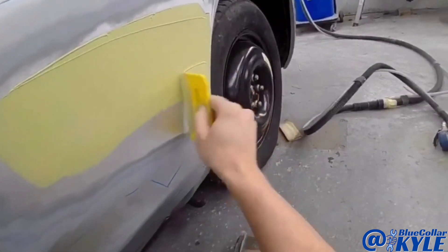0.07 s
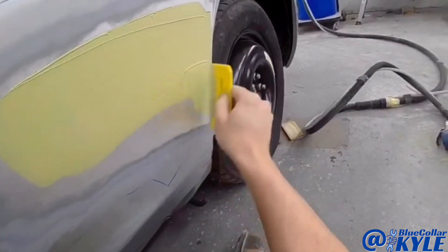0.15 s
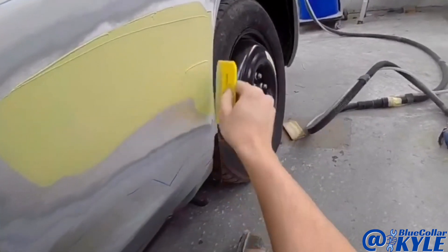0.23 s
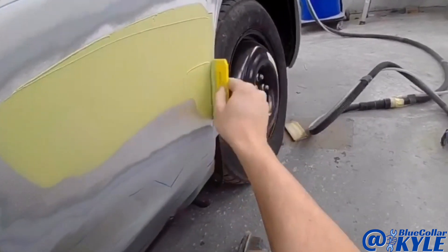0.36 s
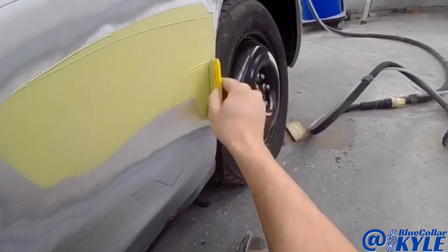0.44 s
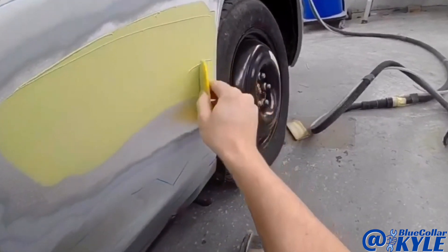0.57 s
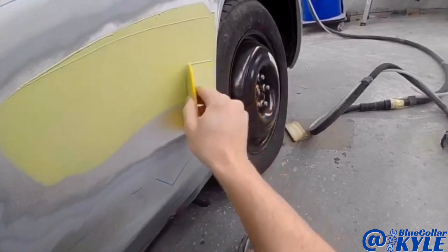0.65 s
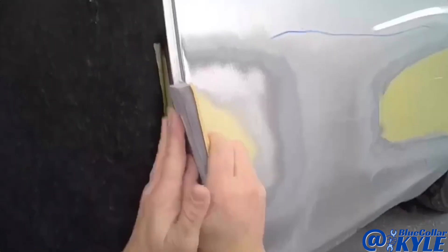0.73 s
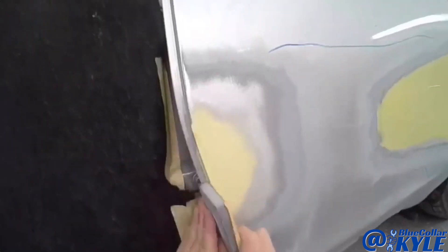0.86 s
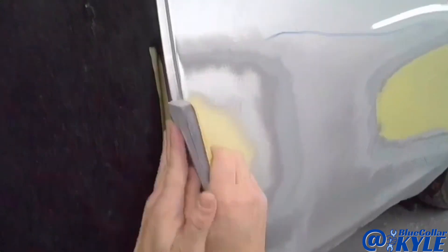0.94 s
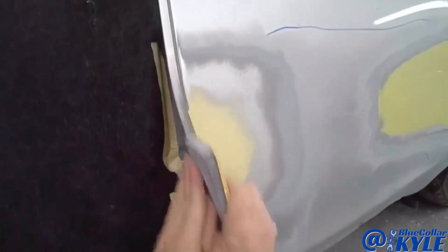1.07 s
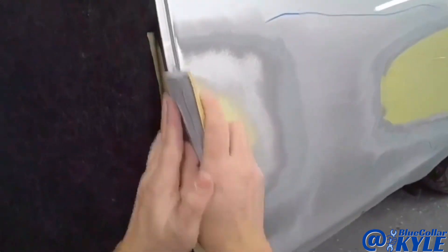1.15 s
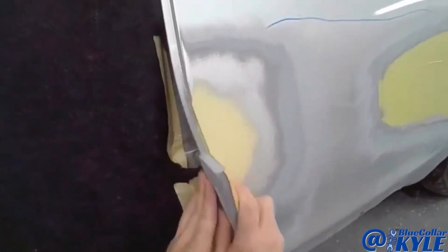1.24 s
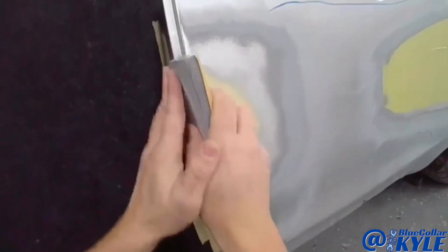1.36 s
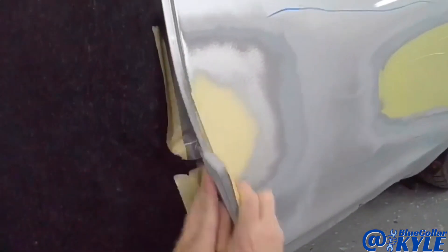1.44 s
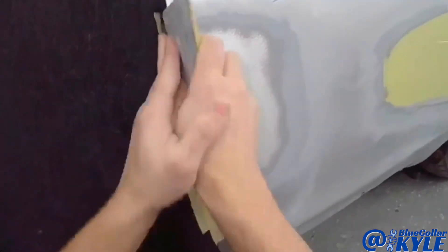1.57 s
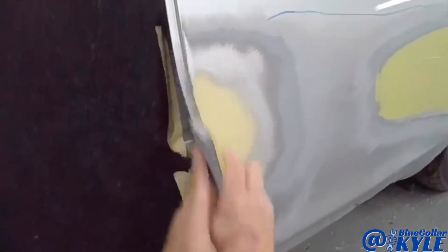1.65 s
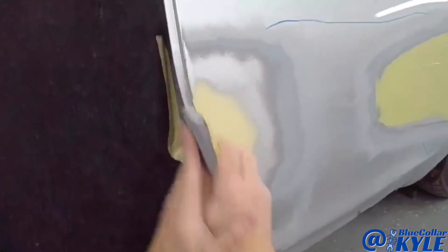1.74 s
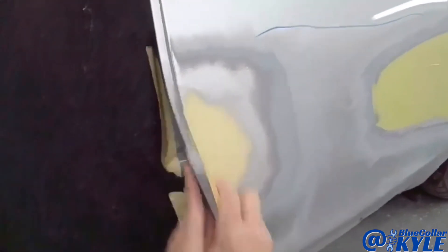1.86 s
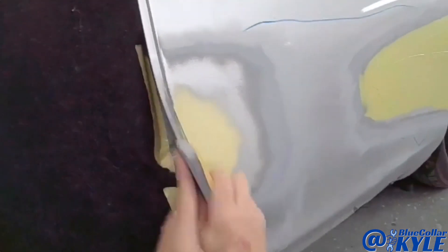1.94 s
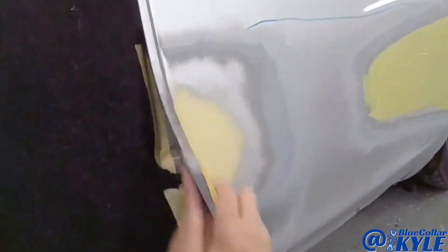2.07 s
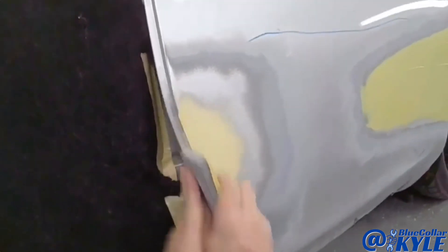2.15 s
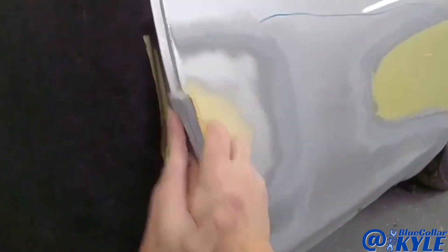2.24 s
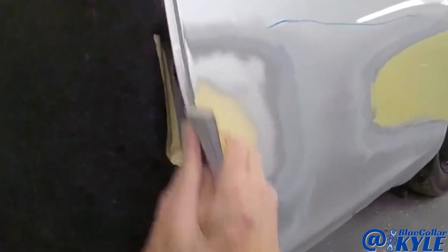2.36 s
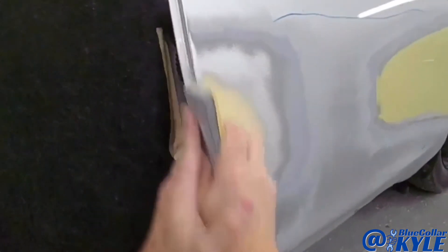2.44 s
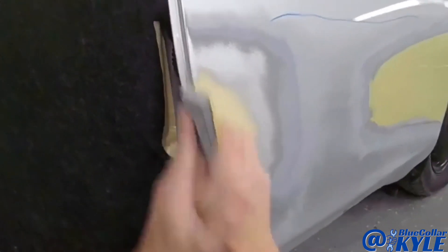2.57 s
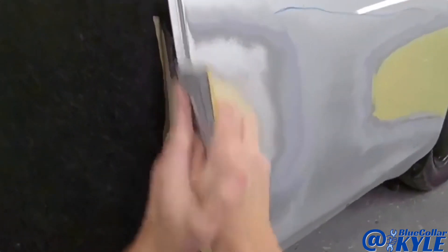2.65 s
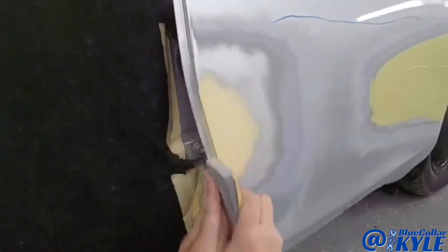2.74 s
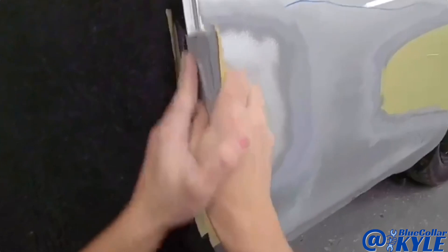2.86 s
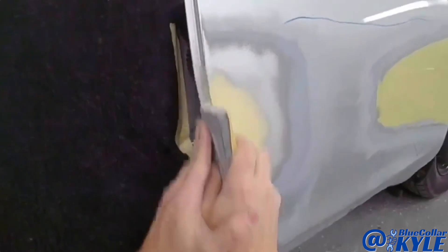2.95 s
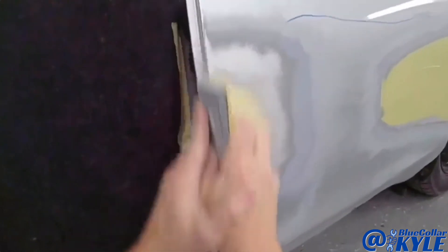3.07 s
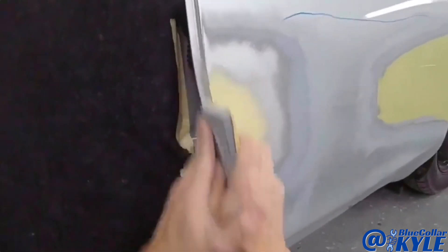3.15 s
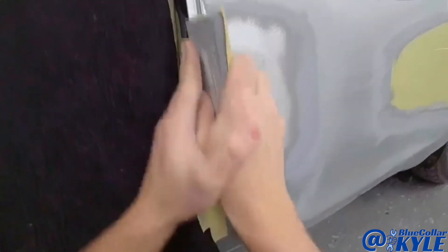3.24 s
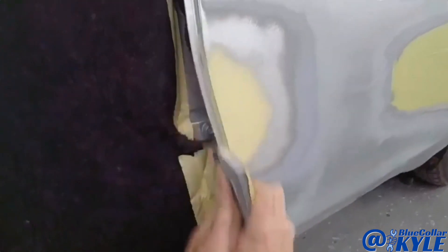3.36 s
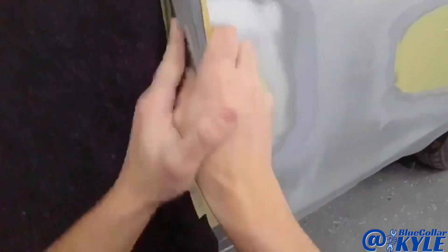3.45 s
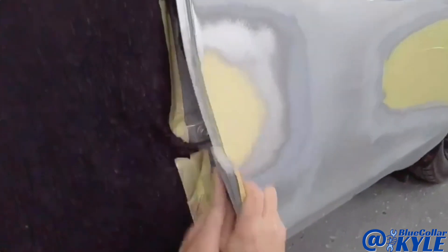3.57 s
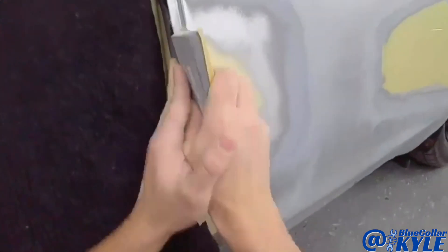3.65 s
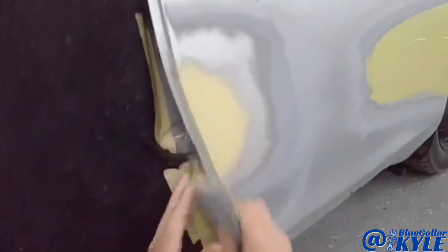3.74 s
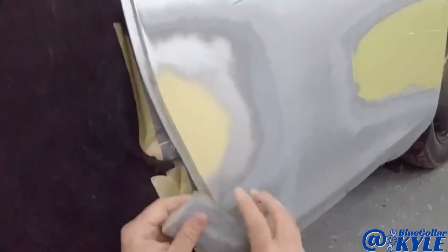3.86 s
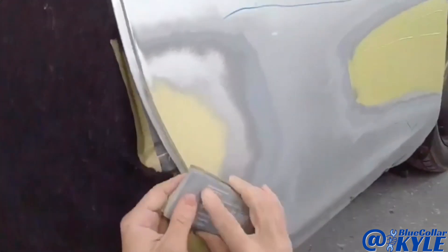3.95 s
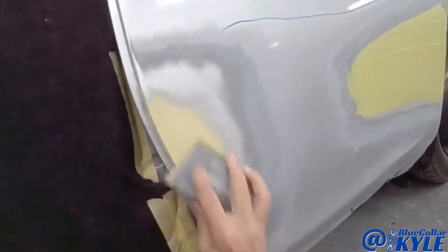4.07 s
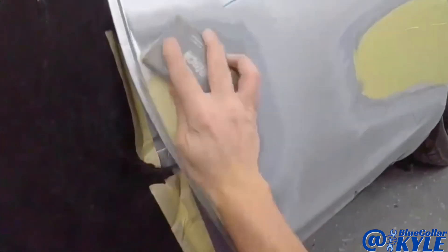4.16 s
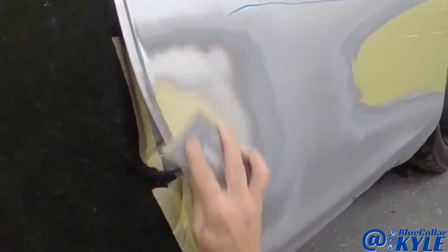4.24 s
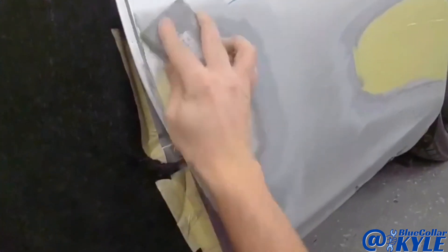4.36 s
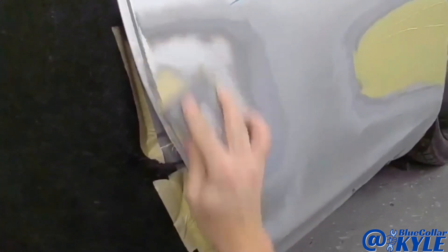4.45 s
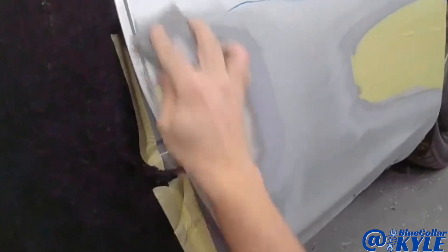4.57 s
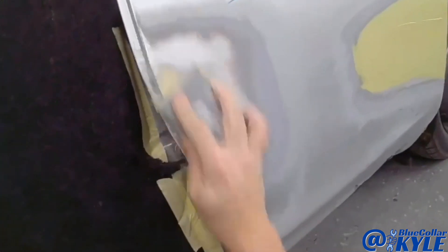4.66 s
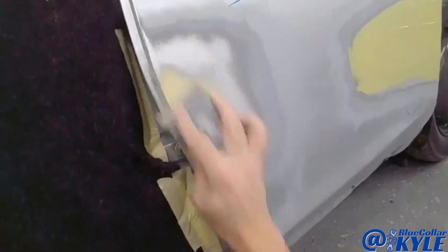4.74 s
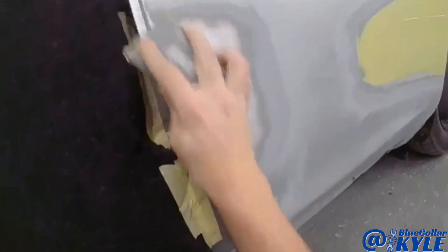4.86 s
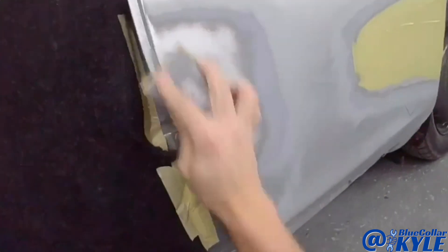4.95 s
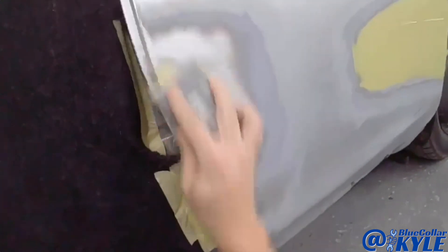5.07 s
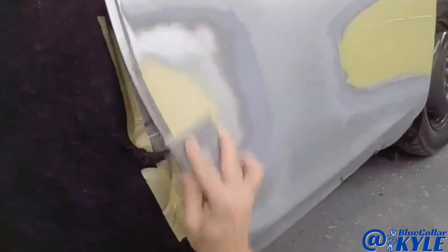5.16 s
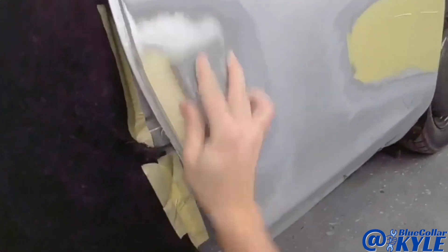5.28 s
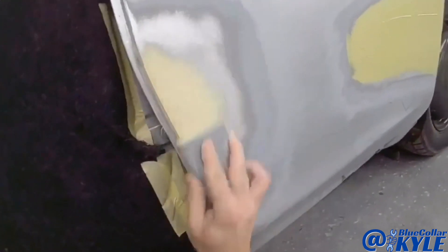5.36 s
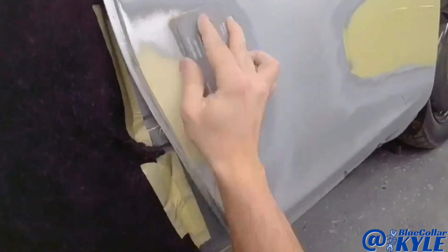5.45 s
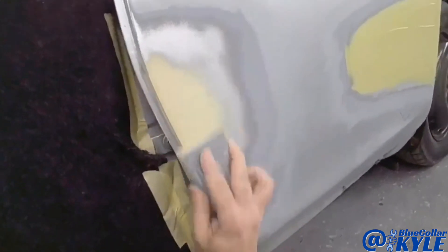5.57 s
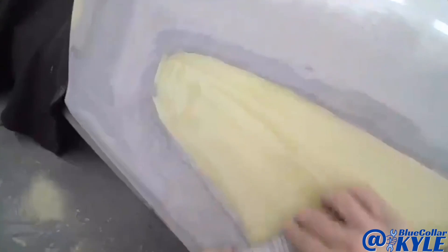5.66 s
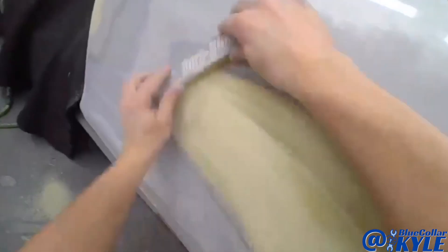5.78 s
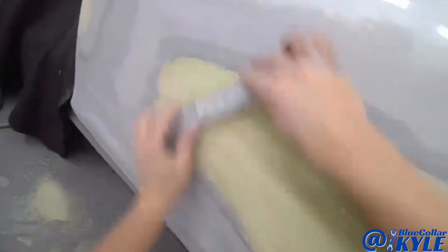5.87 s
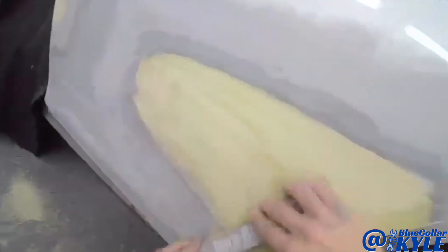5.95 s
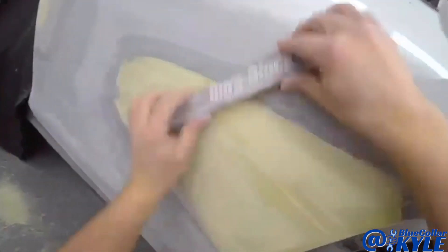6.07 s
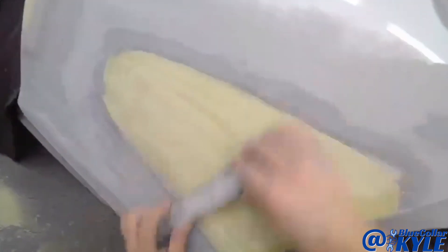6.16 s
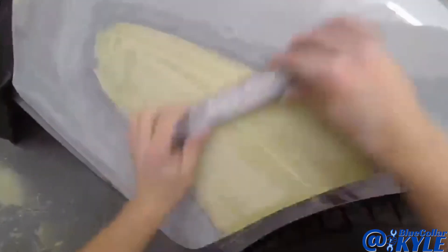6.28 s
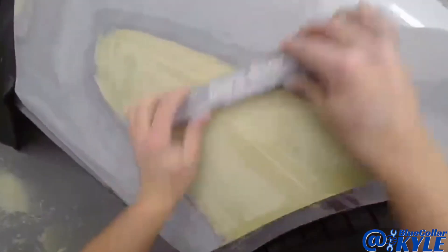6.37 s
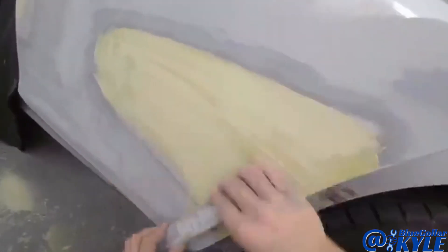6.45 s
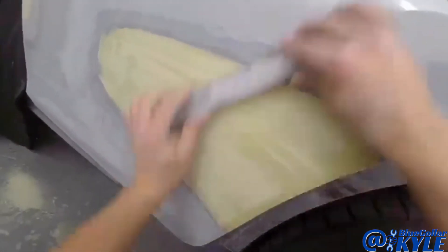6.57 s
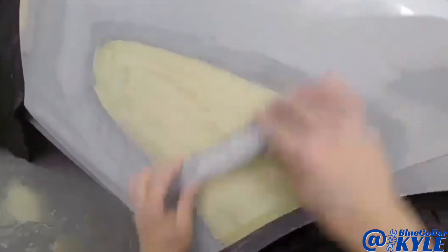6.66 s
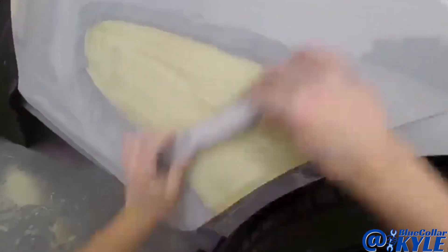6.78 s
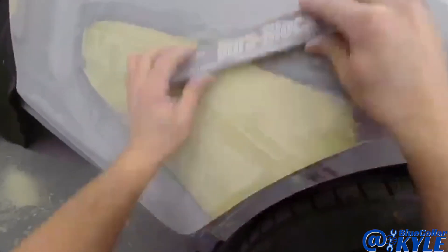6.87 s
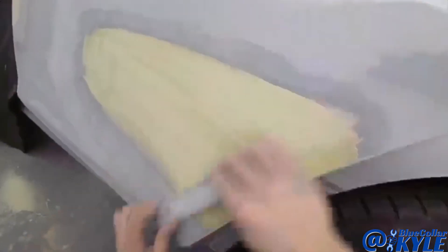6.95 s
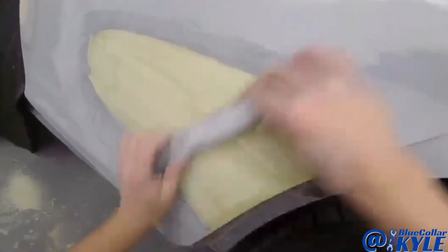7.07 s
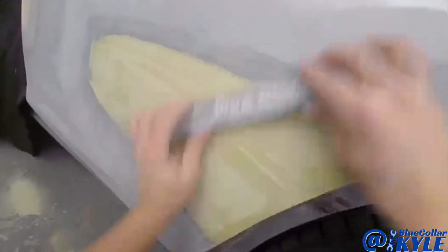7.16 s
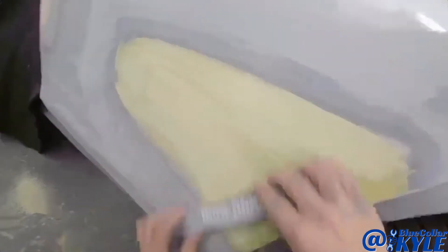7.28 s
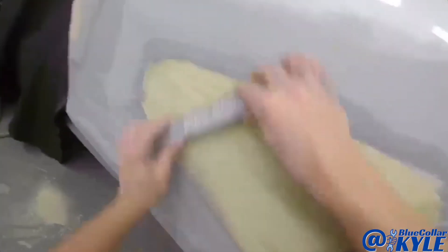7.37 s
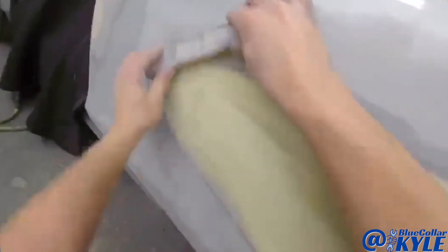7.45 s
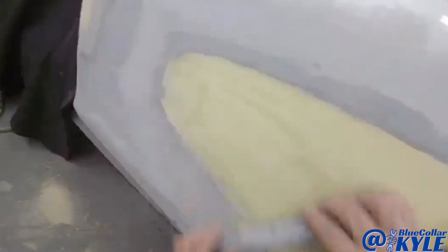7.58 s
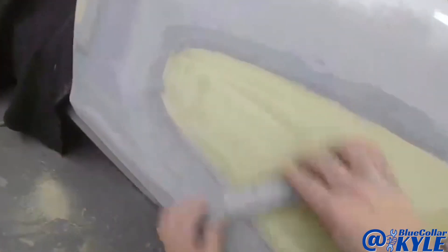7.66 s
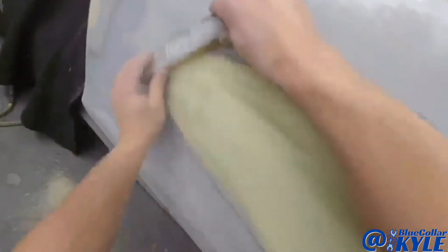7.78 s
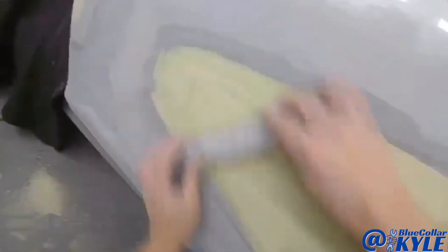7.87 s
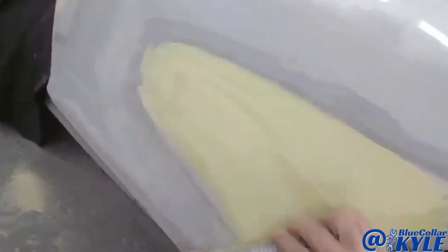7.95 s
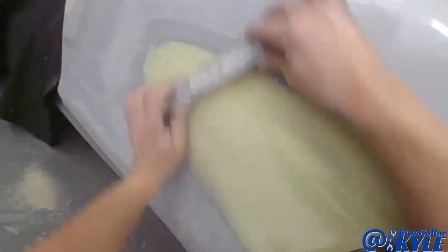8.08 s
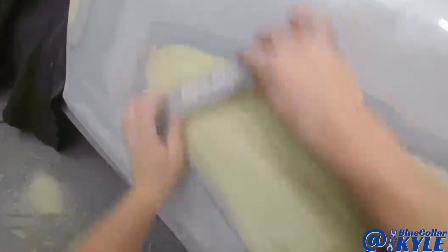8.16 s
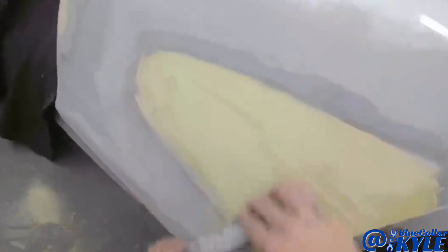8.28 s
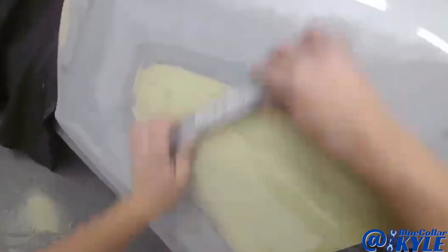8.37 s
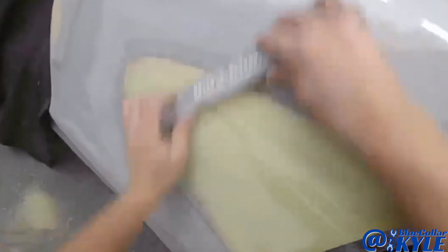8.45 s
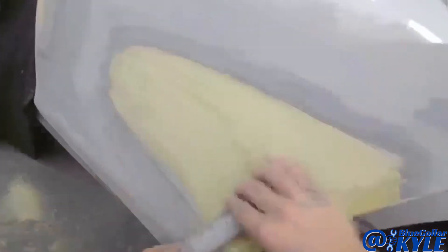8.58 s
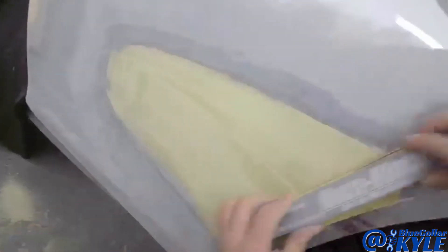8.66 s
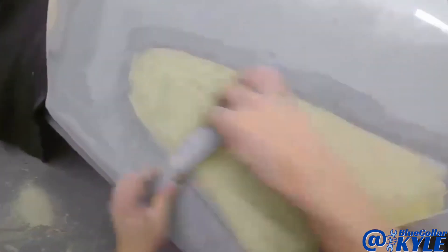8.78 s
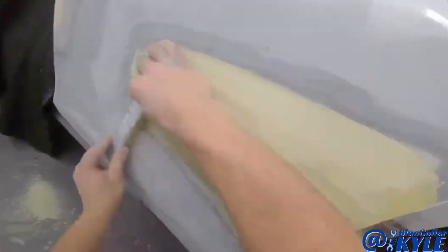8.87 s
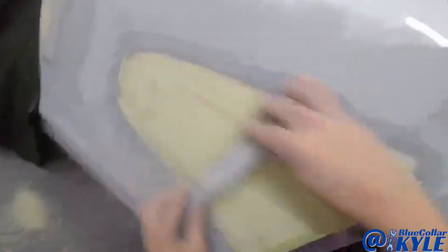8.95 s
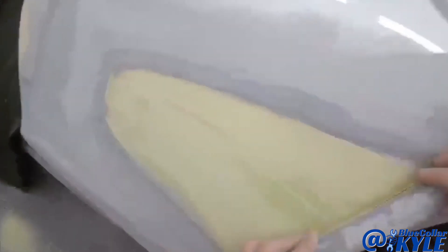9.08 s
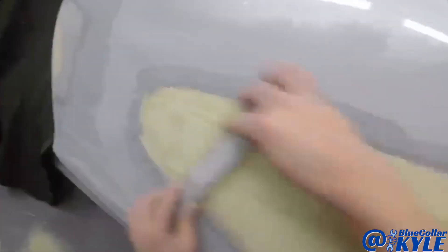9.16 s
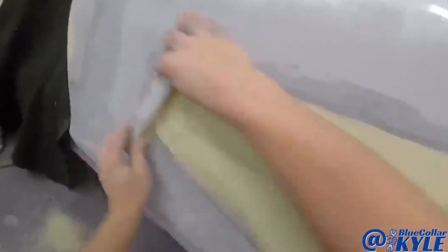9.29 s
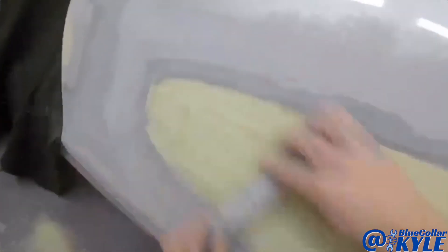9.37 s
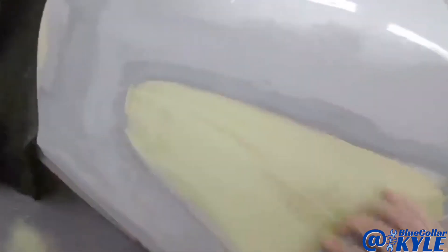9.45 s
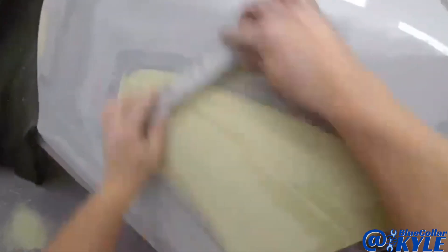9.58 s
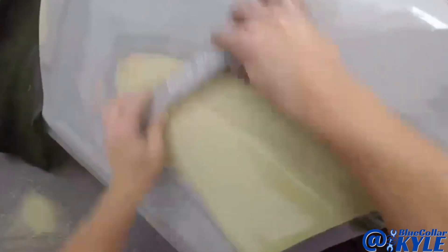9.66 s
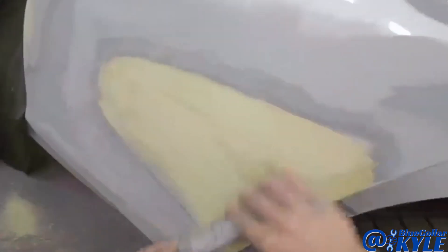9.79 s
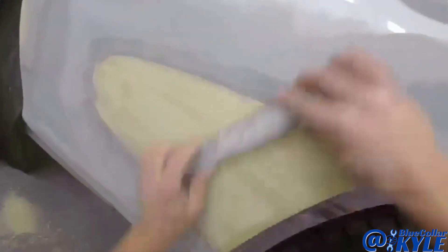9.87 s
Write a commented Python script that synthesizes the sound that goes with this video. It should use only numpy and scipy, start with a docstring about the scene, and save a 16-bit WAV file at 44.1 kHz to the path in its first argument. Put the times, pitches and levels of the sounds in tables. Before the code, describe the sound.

Sandpaper on a block rasps back and forth over body filler on a car panel, heard close in mono over a quiet workshop fan. A brief spreader swish comes first, followed by fast, gritty edge strokes that catch and bite. After a short break the scraping turns smoother and brighter, then changes to longer, hissier sweeps as the fan grows fainter. Now and then the block softly knocks the panel.

```python
"""Hand sanding of body filler on a car panel, close and in mono, in a workshop with a running fan.
After one swipe of a spreader, a small block works the panel's edge, then its face; then a long block
sweeps the filler. Each stroke speeds up and slows to turn; its grit ticks ring the block and the sheet
metal, and the paper chatters, clings and bites as it drags. Now and then the block bumps the panel."""
import sys
import numpy as np
from scipy import signal
from scipy.fft import rfft, irfft
from scipy.io import wavfile
from scipy.ndimage import map_coordinates

SR = 44100
rng = np.random.default_rng(int(sys.argv[2]) if len(sys.argv) > 2 else 0)


def generate_wav(signal):
    """Clip the signal to [-1, 1] and save it as 16-bit WAV at the path in sys.argv[1]."""
    frames = np.transpose(np.atleast_2d(signal))
    scaled = np.clip(frames, -1, 1) * 32767
    pcm = np.round(scaled).astype(np.int16)
    wavfile.write(sys.argv[1], SR, pcm)


N = 437472
TIME = np.arange(N) / SR
SANDING_START_S, LONG_START_S = .729, 5.666


# Strokes, each lasting until the next turn: t/s, level/dB, tilt of hiss over panel drone/dB
EDGE_STROKES = [(0.703, -41.5, -3.0), (0.798, -41.6, 4.0), (0.895, -40.5, -1.0), (0.995, -44.3, 0.0),
                (1.081, -41.6, -3.0), (1.186, -44.5, -1.0), (1.289, -42.3, -2.0), (1.396, -44.1, 2.0),
                (1.51, -43.5, -1.0), (1.625, -43.8, -0.0), (1.741, -42.1, 0.0), (1.833, -43.3, 5),
                (1.943, -41.0, 0.0), (2.054, -43.3, 1.0), (2.159, -41.3, -4.0), (2.267, -48.5, -4.0),
                (2.356, -43.6, -6.0), (2.457, -43.3, 1.0), (2.561, -41.0, 3.0), (2.669, -42.8, 3.0),
                (2.779, -42.2, -1.0), (2.89, -43.9, -2.0), (2.969, -44.1, -3.0), (3.065, -43.3, -1.0),
                (3.173, -43.4, -1.0), (3.273, -41.9, 5.0), (3.387, -41.8, 3.0), (3.49, -44.4, 4.0),
                (3.608, -44.9, 2.0), (3.713, -44.5, -2.0), (3.755, -58.6, -0.0)]
# Feel of the hand, out then back: place of top speed/fraction of stroke, pressure lost/dB
EDGE_HAND = [(.385, 3.4), (.63, 0)]
# Tone of the contact: f/Hz, level/dB
EDGE_COLOUR = [(50, -17.5), (125, -4.5), (390, -14.5), (500, -4.5), (700, 0.5), (980, 3), (1250, -3.5),
               (1750, -3.5), (2300, -4), (2850, -3.5), (3350, -10), (5200, -10), (6800, -16.5), (9500, -11),
               (15500, -18.5)]

def edge_sanding():
    """A small block scrubs the panel's edge: short, chattery strokes with plenty of body."""
    return sanding(
        EDGE_STROKES, EDGE_HAND, EDGE_COLOUR, end_s=3.81, sharpen=-.1, turn_speed=.03,
        ring_hz=2620, ring_rise_hz=240, ring_db=8, ring_width_hz=570, modes_db=3, mode_step_hz=54.66,
        layer_db=(1, 4.3, -4.4, -1.3), speed_powers=(.3, .76, 1.05, 1.85), brighten_db=12.5,
        grit_db=1.5, chatter_db=1.9, chatter_s=.0025, catch_db=1.6, bite_s=.017)


# Strokes on the face: t/s, level/dB, tilt/dB
FACE_STROKES = [(4.09, -37.4, -2.0), (4.214, -38.1, -1.0), (4.315, -38.3, 2.0), (4.418, -39.4, 2.0),
                (4.532, -39.6, 3.0), (4.636, -40.1, 0.0), (4.745, -39.7, -1.0), (4.855, -41.8, -2.0),
                (4.954, -39.7, -2.0), (5.045, -39.2, -0.0), (5.176, -40, -1.0), (5.275, -40.7, -3.0),
                (5.384, -40.3, 0.0), (5.491, -40.4, 1.0), (5.604, -40.5, 3.0)]
# Hand, out then back: place of top speed/fraction of stroke, pressure lost/dB
FACE_HAND = [(.405, 4.8), (.553, -2.5)]
# Tone of the contact: f/Hz, level/dB
FACE_COLOUR = [(50, -22), (130, -15), (410, -17), (700, -1), (1000, 0), (1700, 1.5), (3100, 0.5),
               (4000, 2.5), (5600, 2), (6600, -1), (9500, -2), (13000, -4.5), (15500, -8.5)]

def face_sanding():
    """The small block rubs the panel's face: a smoother, brighter scrape."""
    return sanding(
        FACE_STROKES, FACE_HAND, FACE_COLOUR, end_s=5.675, sharpen=.2, turn_speed=.04,
        ring_hz=2540, ring_rise_hz=140, ring_db=9.5, ring_width_hz=730, modes_db=2.5, mode_step_hz=70.3,
        layer_db=(-5.9, 1.5, 2.6, 1.2), speed_powers=(.42, .78, 1.12, 1.25), brighten_db=5.5,
        grit_db=1.2, chatter_db=.9, chatter_s=.0019, catch_db=1, bite_s=.033)


# Sweeps of the long block: t/s, level/dB, tilt/dB
LONG_STROKES = [(5.643, -39.8, 2.0), (5.831, -39.0, 2.0), (5.974, -40, 0.0), (6.097, -38.4, 1.0),
                (6.231, -39.9, -3.0), (6.356, -38.4, -3.0), (6.488, -40.7, -1.0), (6.619, -38.7, -1.0),
                (6.752, -42.0, -4), (6.88, -39.3, 0.0), (7.016, -41.9, -3.0), (7.143, -39.4, 0.0),
                (7.277, -40.7, 2.0), (7.463, -40, -1.0), (7.628, -41.4, 3.0), (7.799, -40.5, 1.0),
                (7.966, -41.3, 4.0), (8.135, -40.2, -1.0), (8.292, -41.3, -0.0), (8.441, -38.8, -1.0),
                (8.577, -45.7, -3.0), (8.697, -39.4, 3.0), (8.896, -40.5, 1.0), (9.076, -40.2, 4.0),
                (9.282, -41.0, 0.0), (9.462, -41.5, 1.0), (9.634, -40.9, -1.0), (9.791, -41, -3.0)]
# Hand, out then back: place of top speed/fraction of stroke, pressure lost/dB
LONG_HAND = [(.553, 3.2), (.5, .6)]
# Tone of the contact: f/Hz, level/dB
LONG_COLOUR = [(45, -64), (110, -15), (240, -13.5), (750, -9.5), (1200, -6.5), (1800, -4), (2600, 0.5),
               (3400, 0), (4500, 3), (5700, 3), (6500, -1.5), (9000, 0.5), (12000, -5), (15500, -6.5)]

def long_sanding():
    """A long block sweeps the filler: slower strokes, mostly rasp."""
    return sanding(
        LONG_STROKES, LONG_HAND, LONG_COLOUR, end_s=9.97, sharpen=.5, turn_speed=.09,
        ring_hz=5310, ring_rise_hz=60, ring_db=6.8, ring_width_hz=1000, modes_db=1.8, mode_step_hz=70,
        layer_db=(-11.1, .8, 7.8, 2.4), speed_powers=(.57, .77, 1.22, 1.4), brighten_db=9.5,
        grit_db=1.17, chatter_db=.9, chatter_s=.0025, catch_db=.95, bite_s=.029)


def sanding(strokes, hand, colour, end_s, sharpen, turn_speed,
            ring_hz, ring_rise_hz, ring_db, ring_width_hz, modes_db, mode_step_hz,
            layer_db, speed_powers, brighten_db, grit_db, chatter_db, chatter_s, catch_db, bite_s):
    """Grit rings block and sheet in four layers: panel, body, rasp, hiss. Hiss follows speed most."""
    out, size = np.zeros(N), 16384
    hz = np.fft.rfftfreq(size, 1 / SR)
    ends = [row[0] for row in strokes[1:]] + [end_s]
    for k, ((start, level_db, bright_db), end) in enumerate(zip(strokes, ends)):
        peak_at, ease_db = hand[k % 2]
        progress = k / (len(strokes) - 1) - .5  # through the run, 0 half way
        t = np.arange(np.clip(int((end - start) * SR), 2, size)) / SR
        phase = t / t[-1]
        speed = hand_speed(phase, start + t, peak_at, turn_speed) ** (1 + sharpen * progress)
        pressure = undb(ease_db * (.5 - phase))
        # the block has one broad, rising resonance; the sheet's modes are weighted anew wherever it rubs
        block_hz = ring_hz + ring_rise_hz * progress
        block_db = ring_db / (1 + (2 * (hz - block_hz) / ring_width_hz) ** 2)
        sheet_db = modes_db * wander(hz, mode_step_hz) / (1 + hz / 9000)
        # as the work goes on the panel answers less and the hiss grows finer
        tilt_db = (bright_db + brighten_db * progress) * np.linspace(-.5, .5, 4)
        gains = undb(level_db + np.array(layer_db) + tilt_db)
        finer_db = 2 * progress * np.log2(np.maximum(hz / 6700, 1))
        tone = undb(colour_db(colour, hz) + block_db + sheet_db + finer_db)
        scrape = rfft(grit(size, grit_db)) * tone
        panel, body, rasp, hiss = split_layers(scrape, hz)[:, :len(t)]
        # fast stick-slip chatter, and slower catches on ridges of the filler
        chatter = unit(undb(chatter_db * wander(t, chatter_s)))
        drag = chatter * unit(undb(catch_db * wander(t, .00967)))
        grab = bite(start + t, bite_s)  # mostly rings the block's body
        layers = [panel * pressure * np.sqrt(drag * grab * chatter),
                  body * pressure * drag * grab,
                  rasp * drag * np.sqrt(pressure * grab / chatter),
                  hiss * np.sqrt(drag * grab)]
        for gain, layer, power in zip(gains, layers, speed_powers):
            add(out, start, gain * unit(layer * speed ** power))
    return out * np.clip((TIME - SANDING_START_S) * SR / 20, 0, 1)


# The long block swings round one turn without stopping: t/s, half length/s, added loop speed/dB
SWING = (8.585, 0.037, -2)

def hand_speed(phase, times, peak_at, turn_speed):
    """The hand speeds up, slows and turns in a small loop, so the paper never quite rests."""
    skewed = phase * (1 - peak_at) / (phase * (1 - peak_at) + (1 - phase) * peak_at)
    loop = turn_speed + swell(*SWING, t=times)
    return np.hypot(np.sin(np.pi * skewed), loop) / np.hypot(1, loop)


def grit(size, spread_db):
    """Dense ticks of abrasive grains: most are tiny, a few catch hard."""
    catch = np.minimum(rng.standard_exponential(size), 7)
    return rng.standard_normal(size) * undb(spread_db * catch)


def split_layers(spectrum, hz):
    """Cross a scrape over into panel drone, block body, rasp and hiss."""
    below = [1 / (1 + (hz / crossover_hz) ** 24) for crossover_hz in (1400, 3300, 6700)]
    return irfft(spectrum * np.diff([0 * hz, *below, 0 * hz + 1], axis=0))


# The paper bites after a turn: t/s, extra drag/dB
BITES = [(.808, 7), (1.001, 11), (1.092, 3), (1.2, 4), (1.648, 14), (1.96, 3), (2.067, 8), (2.171, 7),
         (2.372, 6), (2.576, 5), (2.687, 11), (2.785, 4), (2.985, 6), (3.088, 6), (3.182, 3), (3.288, 19),
         (4.099, 3), (4.335, 5), (5.075, 4), (6.373, 6), (6.903, 3), (7.168, 4.5), (7.497, 3), (7.994, 3),
         (8.719, 6), (9.107, 7), (9.483, 5)]

def bite(t, relax_s, cling_db=-4, cling_s=.012):
    """Gain that ducks while the paper clings, jumps when it breaks loose and then relaxes."""
    starts, drag_db = np.transpose(BITES)
    since = t - starts[:, None]
    loose = np.clip(since / .004 + .5, 0, 1)
    cling = ((1 - loose) * np.exp(-np.abs(since) / cling_s)).sum(axis=0)
    release = loose * np.exp(-np.maximum(since, 0) / relax_s)
    return undb(cling_db * cling + drag_db @ release)


# The block bumps the panel: t/s, level/dB, f/Hz
BUMPS = [(3.732, -38, 540), (5.528, -46, 125), (6.489, -41.5, 216), (6.763, -37.5, 338), (8.902, -41, 257)]

def bumps(t60=.075, log_spread=.79, attack_s=.006):
    """Soft knocks ring a cluster of five low, hand-damped panel modes."""
    out, t = np.zeros(N), TIME[:SR // 2]
    for start, db, hz in BUMPS:
        modes_hz = hz * np.exp(log_spread * np.linspace(-1, 1, 5) + .049 * rng.standard_normal(5))
        partials = np.sin(2 * np.pi * (modes_hz[:, None] * t + rng.random((5, 1))))
        ring = np.hanning(7)[1:-1] @ partials
        ring *= np.exp(-np.log(1000) * t / t60) * (1 - np.exp(-t / attack_s))
        add(out, start, undb(db) * ring / np.abs(ring).max())
    return out


# Light touches, timed at their peaks: t/s, half length/s, level/dB
TOUCHES = [(0.076, 0.027, -51.5), (3.865, 0.013, -59.5), (3.943, .004, -60), (4.051, 0.0077, -60)]
# Their tone: f/Hz, level/dB
TOUCH_COLOUR = [(300, -18), (1500, 7), (2600, 6), (4000, -2), (6000, -6), (8000, -3), (11000, -1),
                (15500, -6)]

def touches():
    """Spreader, fingers and paper brush by in brief, soft swishes."""
    return sum(swell(*touch) for touch in TOUCHES) * noise(TOUCH_COLOUR)


# The squeak's peak: t/s, half length/s, level/dB
SQUEAK = (1.9, 0.006, -29.5)
# Its tone: f/Hz, level/dB
SQUEAK_COLOUR = [(1750, -24), (2050, 4), (2350, -6), (2900, -22), (3450, -19), (3800, 0), (4300, -39)]

def squeak():
    """One bite of the paper squeaks on two resonances."""
    return swell(*SQUEAK) * noise(SQUEAK_COLOUR)


# Bed of fan and workshop air: f/Hz, level/dB
FAN_COLOUR = [(25, -22), (50, -5), (125, 2.5), (200, -4), (330, -6.5), (450, -10), (600, -11), (760, -2),
              (1000, -6), (1500, -13.5), (2250, -17), (2520, -15.5), (3000, -24), (6500, -40),
              (15500, -44.5)]
# The fainter bed from 5.67 s on: f/Hz, level/dB
LATE_BED_COLOUR = [(25, -32), (55, -35), (100, -2), (190, -2), (245, 3.5), (320, -2), (700, -10),
                   (1500, -12), (4000, -11), (15500, -14)]

def fan():
    """A fan drones through the room's resonances; from 5.67 s the bed turns fainter and takes another colour."""
    drone = noise(FAN_COLOUR, ripple_db=2.4, ripple_hz=14)
    drone *= undb(.6 * wander(TIME, .053))  # slight flutter
    drone *= undb(np.where(TIME < SANDING_START_S, -50, -52))
    late_bed = undb(-56) * noise(LATE_BED_COLOUR, ripple_db=1, ripple_hz=10)
    return np.where(TIME < LONG_START_S, drone, late_bed)


def workshop(x, wet_db, t60, dull_hz=8000):
    """Floor and walls add a faint diffuse tail, duller than the direct sound."""
    t = TIME[:SR // 2]
    tail = rng.standard_normal(len(t)) * np.exp(-np.log(1000) * t / t60) * (t > .004)
    tail = signal.sosfilt(signal.butter(1, dull_hz, fs=SR, output="sos"), tail / np.linalg.norm(tail))
    return x + undb(wet_db) * signal.fftconvolve(x, tail)[:N]


def noise(points, ripple_db=0, ripple_hz=20):
    """Steady coloured noise, optionally rippled by many narrow resonances."""
    hz = np.fft.rfftfreq(N, 1 / SR)
    gain = undb(colour_db(points, hz) + ripple_db * wander(hz, ripple_hz))
    return unit(irfft(rfft(rng.standard_normal(N)) * gain, N))


def colour_db(points, hz):
    """Read an EQ curve along a log-frequency axis."""
    f, db = np.transpose(points)
    return np.interp(np.log(hz + 1), np.log(f), db)


def wander(axis, step):
    """Smooth random drift, one new value a step along time or frequency."""
    place = (axis - axis[0]) / step
    return map_coordinates(rng.standard_normal(4096), [place], order=2, mode="wrap")


def swell(peak_s, half_s, db, t=TIME):
    """A bell-shaped rise and fall."""
    return undb(db) * np.exp(-.5 * ((t - peak_s) / half_s) ** 2)


def undb(db):
    """Decibels to gain."""
    return 10 ** (np.asarray(db) / 20)


def unit(x):
    """Scale to rms 1."""
    return x / np.sqrt(np.mean(x ** 2) + 1e-18)


def add(track, start, sound):
    """Mix a sound into a track from a given time on."""
    i = max(int(start * SR), 0)
    part = sound[:max(N - i, 0)]
    track[i:i + len(part)] += part


def scene():
    """Three ways of sanding over the fan's bed, the same in both channels."""
    edge, face, sweep = edge_sanding(), face_sanding(), long_sanding()
    small_block = workshop(edge + face, wet_db=-15, t60=.5)
    long_block = workshop(sweep, wet_db=-15.5, t60=.44)
    mono = small_block + long_block + bumps() + touches() + squeak() + fan()
    return np.array([mono, mono])


def record(dry):
    """A steep low-pass cuts the top at 15.8 kHz."""
    return signal.sosfilt(signal.ellip(12, .1, 80, 15800, fs=SR, output="sos"), dry)


dry = scene()
out = record(dry)
generate_wav(out)
```